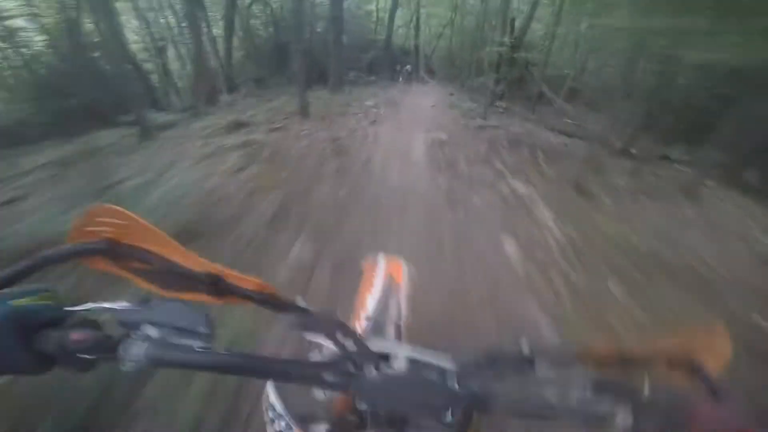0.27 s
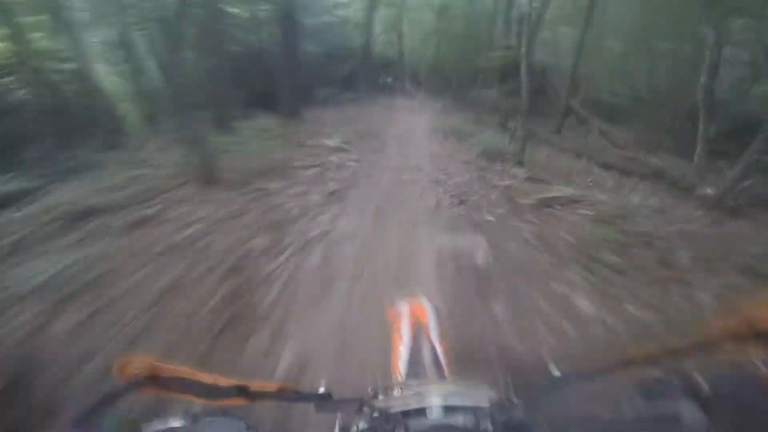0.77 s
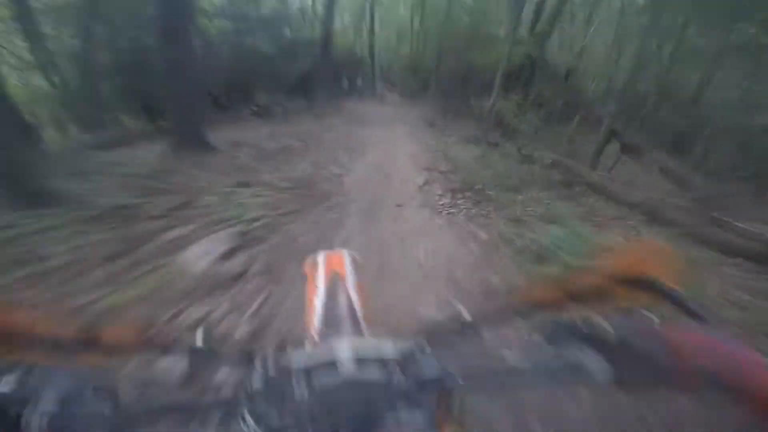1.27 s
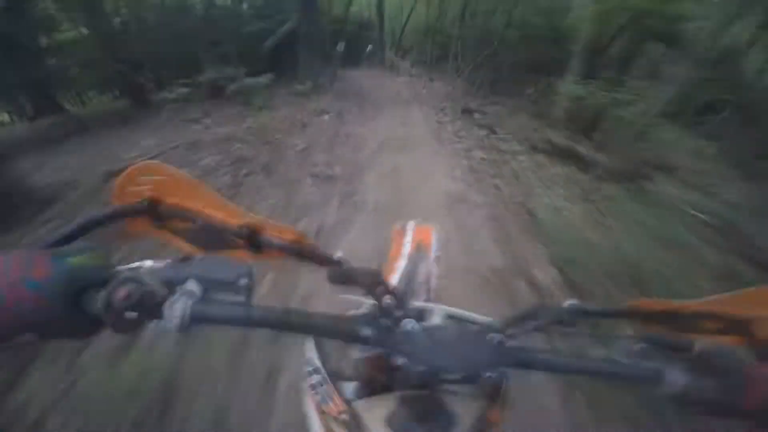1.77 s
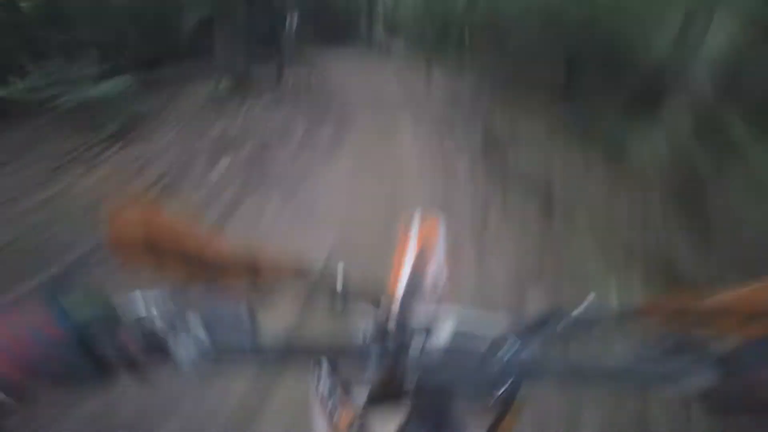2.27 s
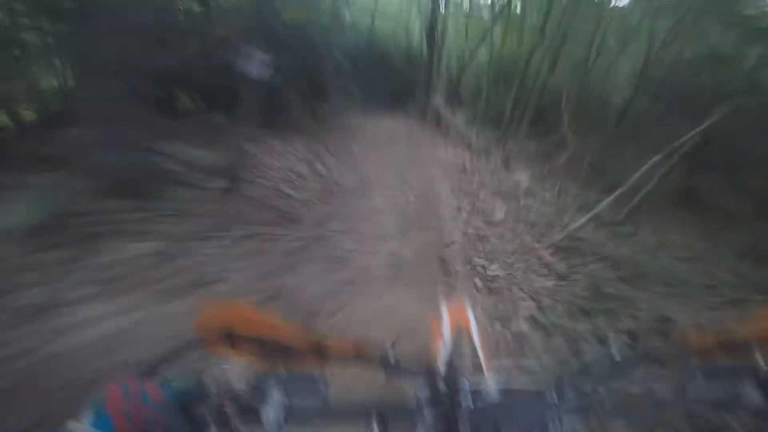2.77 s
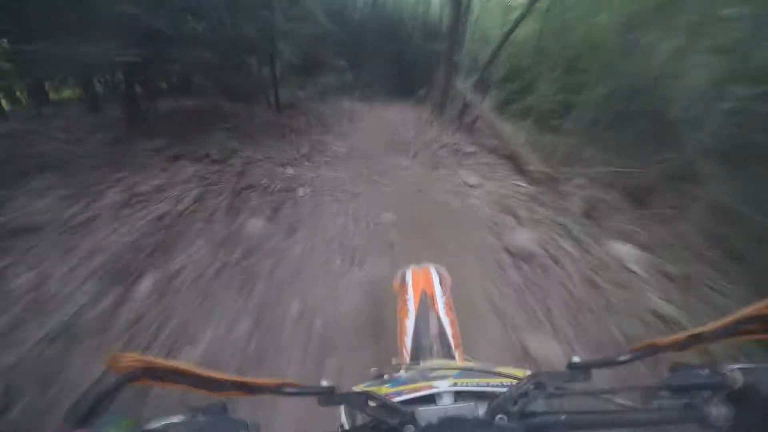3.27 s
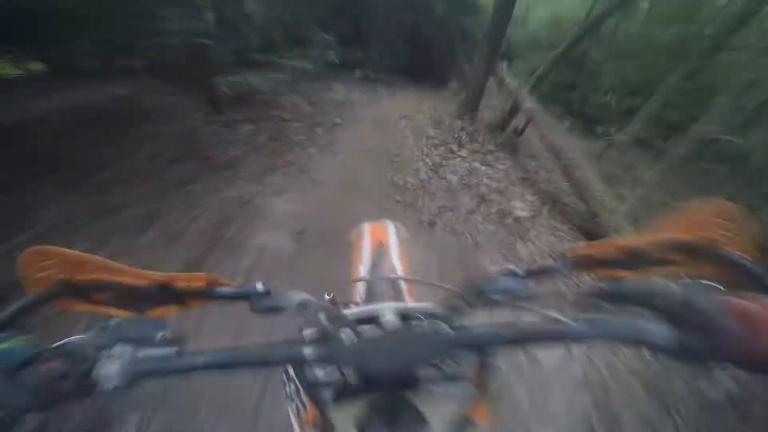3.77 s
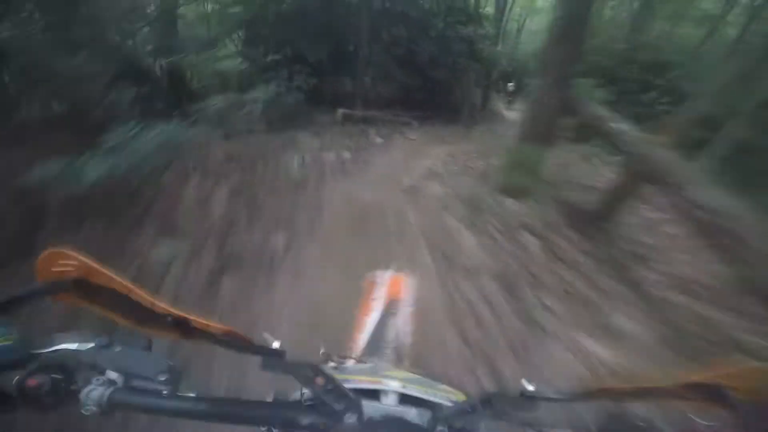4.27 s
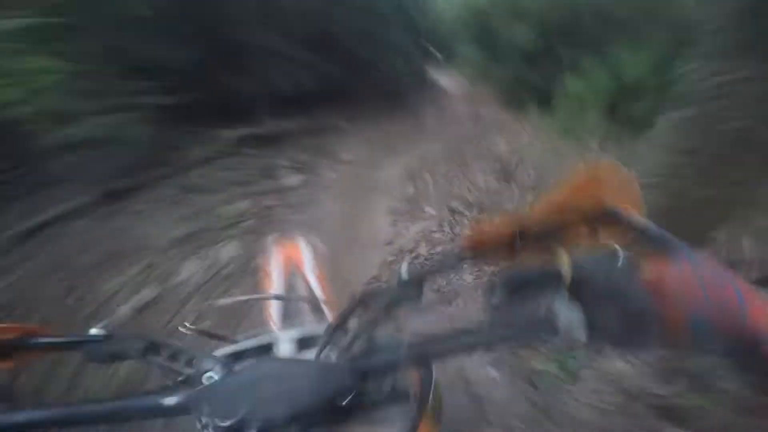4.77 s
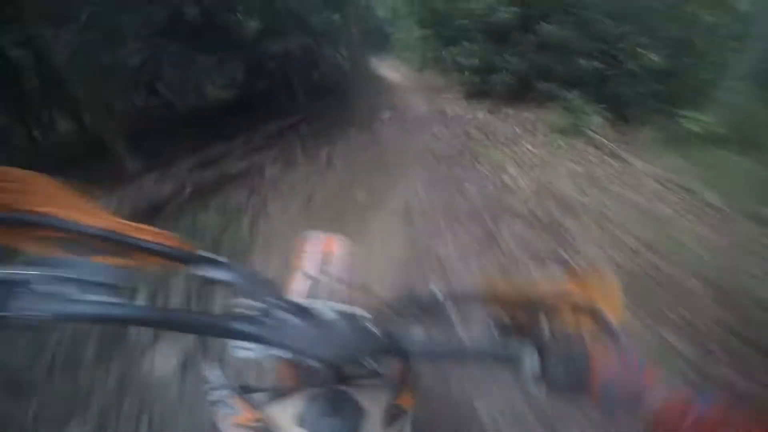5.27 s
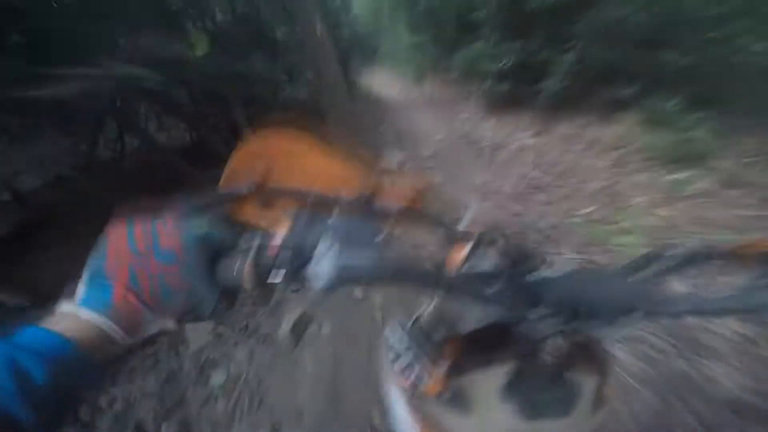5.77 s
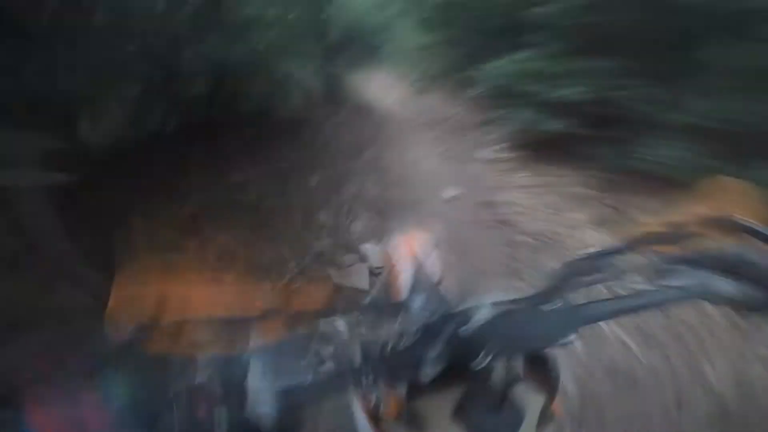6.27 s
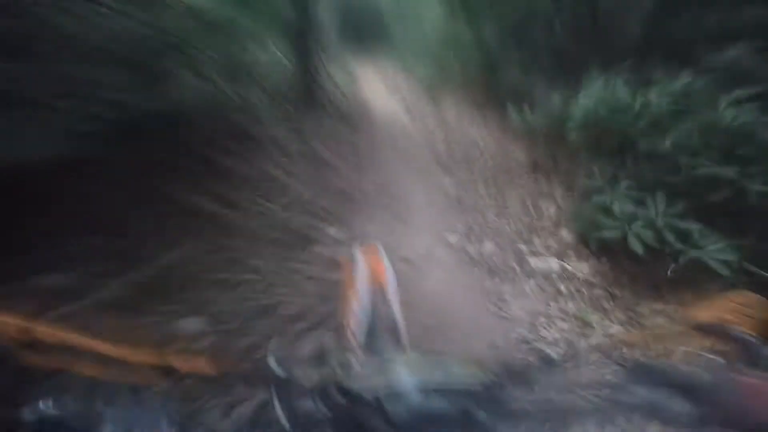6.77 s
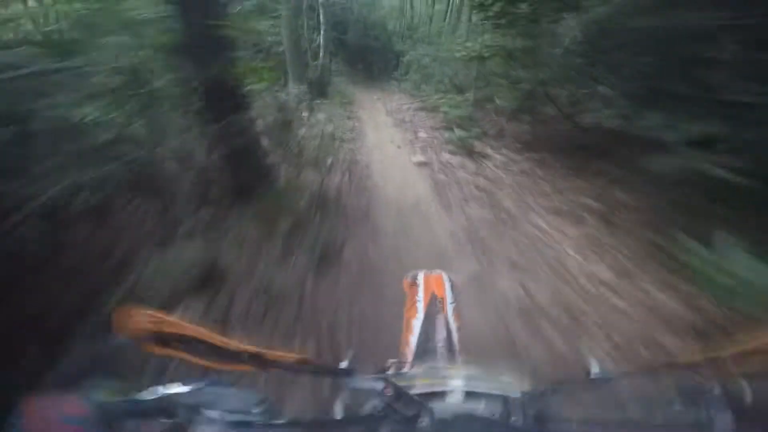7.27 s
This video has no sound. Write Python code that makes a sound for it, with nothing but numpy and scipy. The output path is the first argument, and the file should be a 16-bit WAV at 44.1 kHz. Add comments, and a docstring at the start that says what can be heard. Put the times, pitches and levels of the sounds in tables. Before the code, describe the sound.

Deep, uneven thuds and rumble shake a microphone worn by a mountain bike rider on a woodland trail. Close below, tyres crackle over dirt, chain and cables slap, wheels knock on roots and the coasting hub whirrs softly. After one short grab of the brake, a longer stuttering pull turns into a gritty skid in the middle. The tyre grips with a heavy jolt, and after another short brake stutter the bike rattles on.

```python
"""A dirt trail in a wood; the microphone is in a camera strapped to the rider of a fast mountain bike.
From the start, close below, tyres hiss and crackle over grit and the coasting hub whirrs; roots jolt
the camera, which thuds and sways on its mount; chain and cables rattle. At 2.5 s the brake grabs briefly.
Near 4 s a tyre stutters and skids through a turn, and the nearby bank throws the hiss back.
At 5 s it grips again; a last dab of the brake at 6.4 s leads onto more stony ground."""
import sys
import numpy as np
from scipy import signal
from scipy.fft import rfft, irfft
from scipy.io import wavfile

SR = 44100
rng = np.random.default_rng(int(sys.argv[2]) if len(sys.argv) > 2 else 0)


def wrap_up_sound(samples):
    """Save the sound to the file named by the first command line argument, as 16-bit audio."""
    columns = np.atleast_2d(samples).T
    # keep every value between -1 and 1, then stretch to whole-number steps
    tamed = np.clip(columns, -1, 1)
    steps = np.round(tamed * 32767).astype(np.int16)
    wavfile.write(sys.argv[1], SR, steps)


N = 332514
TIME = np.arange(N) / SR


def gain_of(db):
    """Decibels to amplitude."""
    return 10 ** (np.asarray(db) / 20)


def unit_rms(x):
    """Scales to rms 1."""
    return x / np.sqrt(np.mean(x ** 2) + 1e-20)


def curve(rows):
    """Joins (time, value) rows by straight lines."""
    return np.interp(TIME, *np.transpose(rows))


def add(mix, s, sound):
    """Mixes a sound in at time s."""
    start = round(s * SR)
    sound = sound[max(-start, 0):]
    part = mix[max(start, 0):][:len(sound)]
    part += sound[:len(part)]


def coloured(x, spectrum, size=8192):
    """Minimum-phase filter of unit energy: the spectrum sets the colour, not the level."""
    hz, db = np.transpose(spectrum)
    bins_hz = abs(np.fft.fftfreq(size, 1 / SR)) + 1
    log_gain = np.log(gain_of(np.interp(np.log(bins_hz), np.log(hz), db)))
    taps = np.fft.ifft(np.exp(np.conj(signal.hilbert(log_gain)))).real[:size // 2]
    return signal.oaconvolve(x, taps / np.linalg.norm(taps))[:len(x)]


def wander(rate_hz):
    """Random drift of rms 1, mostly slower than rate_hz."""
    hz = np.fft.rfftfreq(N, 1 / SR)
    return unit_rms(irfft(rfft(rng.standard_normal(N)) / (1 + (hz / rate_hz) ** 2), N))


def grit(per_s, spread_db):
    """Sparse clicks of grains; a few are much louder, or softer if the spread is negative."""
    size = gain_of(spread_db * np.minimum(rng.exponential(1, N), 5))
    return unit_rms(size * rng.choice([-1, 1], N) * (rng.random(N) < per_s / SR))


def burst(t, rise, t60):
    """A puff of noise that starts at t = 0 and dies away."""
    age = np.maximum(t, 0)
    return rng.standard_normal(len(t)) * (1 - np.exp(-age / rise)) * gain_of(-60 * age / t60)


# Rolling level of the tyres, set by speed and ground: t/s, level/dB
ROLL_LEVEL = [(0.0, -43), (0.65, -43.5), (1.75, -41), (2.2, -45), (2.6, -41.5), (2.88, -49), (3.28, -46.5),
              (3.65, -45), (3.84, -46.5), (4.14, -30.5), (4.3, -36), (4.87, -39), (5.1, -48.5),
              (5.31, -52.5), (6.05, -46.5), (6.55, -39.5), (7.05, -44), (7.54, -43.5)]
# Stony stretches of trail: start t/s, end t/s
STONY_SPANS = [(0.98, 1.144), (1.651, 2.0), (2.3, 2.57), (3.119, 3.27), (3.34, 3.42), (6.48, 7.24)]
# Spectra of crushed soil, flying grit and scrubbing tread: f/Hz, level/dB
ROLL_SPECTRUM = [(150, -22.5), (400, -7), (680, 2), (840, -2), (1230, 2.5), (1520, 1), (1850, 4.5),
                 (2300, -2), (2900, 4), (3500, -6.5), (4100, -1), (5100, -14.5), (6500, -18.5),
                 (10000, -30)]
SPRAY_SPECTRUM = [(2000, -11.5), (4000, 0.5), (5200, 2.5), (6500, -6), (8500, -12), (10000, -15),
                  (12000, -23), (13500, -22), (16000, -51)]
SCRUB_SPECTRUM = [(90, -17), (170, 6), (265, 6.5), (350, 1.5), (450, -3), (560, -5.5), (680, -8),
                  (850, -13.5), (1500, -49)]
def tyres(spray_db=-12, stony_spray_db=-59, scrub_db=-6, jolt_scrub_db=-33.5):
    """Close below the microphone, knobs crush soil in clumps, throw grit and scrub under load."""
    clumps, roll_db = wander(rate_hz=36), curve(ROLL_LEVEL)
    stony = sum((TIME > start) & (TIME < end) for start, end in STONY_SPANS)
    stony_spray = gain_of(stony_spray_db + 2.9 * wander(rate_hz=8.3)) * stony
    thrown = np.hypot(gain_of(roll_db + spray_db), stony_spray)
    crunch = unit_rms(rng.standard_normal(N) + 0.62 * grit(per_s=1500, spread_db=2))
    fizz = unit_rms(rng.standard_normal(N) + gain_of(-18) * grit(per_s=330, spread_db=-3.5))
    roll = coloured(crunch, ROLL_SPECTRUM) * gain_of(roll_db + 2.2 * clumps)
    spray = coloured(fizz, SPRAY_SPECTRUM) * thrown * gain_of(2 * clumps + 2 * wander(rate_hz=25))
    load = gain_of(jolt_scrub_db) * jolt_load(rise_s=0.0061, fall_s=0.039)
    pressed = np.hypot(gain_of(scrub_db) * frame_vibration(), load)
    scrub = coloured(rng.standard_normal(N), SCRUB_SPECTRUM) * pressed
    scrub *= gain_of(4 * wander(rate_hz=47) + 2 * wander(rate_hz=8))
    # flung pebbles tick on the frame
    tick = burst(np.arange(SR // 40) / SR, rise=0.0006, t60=0.029)
    ticks = unit_rms(signal.oaconvolve(grit(per_s=60, spread_db=-0.5), tick)[:N])
    pebbles = coloured(ticks, STRIKE_SPECTRUM) + 0.14 * coloured(ticks, SIZZLE_SPECTRUM)
    return roll + spray + scrub + pebbles * thrown


# Spectrum of ploughed soil: f/Hz, level/dB
SOIL_SPECTRUM = [(200, -23), (550, -2), (840, -23), (1250, 3), (1850, 3), (2300, -2.5), (3050, 7.5),
                 (3600, -2), (5000, -16), (9000, -69)]
def skid(peak_s=4.09, grip_s=5.02, rise_db_per_s=99, grip_db_per_s=300):
    """The sliding tyre ploughs loose soil: a burst of sand, then a darker, lumpy roar until it grips."""
    since_peak = np.maximum(TIME - peak_s, 0)
    swell_db = -rise_db_per_s * np.maximum(peak_s - TIME, 0)
    grip_db = -grip_db_per_s * np.maximum(TIME - grip_s, 0)
    soil = unit_rms(rng.standard_normal(N) + 0.88 * grit(per_s=2700, spread_db=2))
    sand = unit_rms(rng.standard_normal(N) + 0.73 * grit(per_s=6500, spread_db=9))
    roar = coloured(soil, SOIL_SPECTRUM) * gain_of(-35 - 14.5 * since_peak + 2.5 * wander(rate_hz=46))
    spray = coloured(sand, SPRAY_SPECTRUM) * gain_of(-33.5 - 63 * since_peak)
    return (roar + spray) * gain_of(swell_db + grip_db)


# Pulls of the brake: start t/s, end t/s, starting level/dB, final level/dB
BRAKE_PULLS = [(2.52, 2.63, -31, -35), (3.767, 4.133, -26.5, -22), (6.428, 6.54, -25, -22.5)]
def brake_stutter(grunt_hz=254.7, squawk_hz=548):
    """The braked tyre grabs and lets go in a quick run; each grab is a rough grunt with a scrape."""
    out, t = np.zeros(N), np.arange(SR // 10) / SR
    swell = t / 0.0049 * np.exp(1 - t / 0.0063)
    for start, end, first_db, last_db in BRAKE_PULLS:
        for s in grab_times(start, end):
            late, detune, uneven = rng.standard_normal(3)
            angle = 2 * np.pi * t * (1 + 0.096 * detune)
            squawk = gain_of(-16.5 + 50 * (s - start))  # the upper tone grows while the brake is held
            tone = (np.sin(grunt_hz * angle) + squawk * np.sin(squawk_hz * angle)) / np.hypot(1, squawk)
            roughness = 0.35 * coloured(rng.standard_normal(len(t)), SCRUB_SPECTRUM)
            grunt = tone * gain_of(-60 * t / 0.12) + roughness
            scrape = gain_of(-17.5) * coloured(rng.standard_normal(len(t)), PAWL_SPECTRUM)
            db = np.interp(s, [start, end], [first_db, last_db]) + 0.61 * uneven
            add(out, s + 0.002 * late, gain_of(db) * swell * (grunt + scrape))
    return out


def grab_times(start, end, per_s=28, quicken_per_s2=85):
    """The tyre grabs faster and faster during one pull of the brake."""
    held = np.arange(0, end - start, 1 / SR)
    count = np.floor(per_s * held + quicken_per_s2 * held ** 2 / 2)
    return start + held[np.diff(count, prepend=-1) > 0]


MOUNT_HZ = 53.52  # the camera mount's own swing
# Heavy jolts at the microphone: crest t/s, thud level/dB, thud f/Hz, sway level/dB
CAMERA_JOLTS = [(0.024, -21, 82, -15.5), (0.129, -11.5, 92, -12.5), (0.298, -14, 86, -6.5),
                (0.563, -21, 117, -24), (0.784, -8.5, 91, -11), (0.935, -15, 92, -15),
                (1.104, -10.5, 81.5, -18), (1.181, -17, 93, -9), (1.318, -15, 93, -17.5),
                (1.436, -9, 85, -6.5), (1.637, -15.5, 96, -8.5), (1.864, -23.5, 103, -15.5),
                (2.032, -1.5, 96.5, -9), (2.455, -13.5, 98, -17), (2.547, -16, 86, -17),
                (2.74, -3.5, 83, -8.5), (3.073, -21.5, 97, -15.5), (3.521, -7.5, 98, -8.5),
                (3.773, -18.5, 99, -16.5), (3.922, -18.5, 93.5, -10), (4.018, -4, 92, -37),
                (4.072, -11, 94, -11.5), (4.243, -18.5, 84, -14.5), (4.612, -8.5, 97.5, -8.5),
                (4.738, -11.5, 96, -12.5), (5.017, -2, 78, -7.5), (5.445, -10, 97.4, -10),
                (5.639, -19.5, 84, -19), (5.836, -19.5, 102, -18), (6.094, -8, 94.5, -8.5),
                (6.294, -11, 95, -7), (6.519, -6, 110, -4.5), (6.741, -16, 102, -8), (6.985, -12, 86, -7),
                (7.46, -19, 103, -20)]
def jolts(sway_t60=0.93, lead_s=0.03):
    """Each jolt thuds through the camera; the mount swings on until the next jolt seats it anew."""
    out, t = np.zeros(N), np.arange(SR) / SR - lead_s
    next_times = [row[0] for row in CAMERA_JOLTS[1:]] + [N / SR + 1]
    for (s, thud_db, hz, sway_db), next_s in zip(CAMERA_JOLTS, next_times):
        onset = (1 + np.tanh((t + 0.002) / 0.009)) / 2
        cutoff = (1 - np.tanh((s + t - next_s + 0.006) / 0.003)) / 2
        sway = gain_of(sway_db - 60 * t / sway_t60) * onset * cutoff * np.cos(2 * np.pi * MOUNT_HZ * t)
        # the rider's body gives
        heave = gain_of(thud_db - 5) * np.exp(-(t / 0.022) ** 2) * np.cos(2 * np.pi * 37 * t)
        add(out, s - lead_s, thud(t, thud_db, hz) + sway + heave)
    return out


def thud(t, db, hz):
    """A few low cycles that crest at t = 0."""
    push = np.where(t < 0, np.exp(-(t / 0.01) ** 2), 1 / np.cosh(t / 0.0091))
    return gain_of(db) * push * np.cos(2 * np.pi * hz * t)


def jolt_load(rise_s, fall_s):
    """The weight that the jolts put on the bike builds up to each crest and eases off."""
    power, t = np.zeros(N), np.arange(-SR // 2, SR // 2) / SR
    shape = np.exp(-np.maximum(-t / rise_s, t / fall_s))
    for s, thud_db, _, _ in CAMERA_JOLTS:
        add(power, s + t[0], (gain_of(thud_db) * shape) ** 2)
    return np.sqrt(power)


def frame_vibration(top_db=-41):
    """How hard the frame shakes: it follows the rolling level, capped below the skid's surge."""
    return gain_of(top_db + 0.96 * np.minimum(curve(ROLL_LEVEL) - top_db, 0))


def bumps(per_s=6.5, thud_hz=99.7):
    """Small bumps knock the frame, thud lightly and nudge the mount, harder the faster the bike rolls."""
    out, t, vibration = np.zeros(N), np.arange(-SR // 30, SR // 2) / SR, frame_vibration()
    swing = (1 + np.tanh(t / 0.009)) / 2 * np.cos(2 * np.pi * MOUNT_HZ * t)
    ringing = swing * gain_of(2.5 - 60 * t / 0.49) + gain_of(-16) * frame_ring(t + 0.01)
    slots = np.arange(0, N / SR, 1 / per_s)
    for s, (late, softness) in zip(slots, rng.random((len(slots), 2))):
        db = 20 * np.log10(np.interp(s, TIME, vibration)) + 20 - 8 * softness
        add(out, s + late / per_s + t[0], thud(t, db, thud_hz) + gain_of(db) * ringing)
    return out


# Wheel strikes: t/s, knock level/dB, crack level/dB, crack f/Hz
WHEEL_STRIKES = [(0.999, -30, -38, 1670), (1.427, -23.5, -41, 1940), (1.624, -27, -27, 1220),
                 (1.777, -35, -24.5, 2140), (2.003, -21, -26, 1640), (2.022, -20, -16, 1144),
                 (2.725, -17, -23, 2096), (4.592, -23.5, -28, 1580), (5.001, -12.5, -20, 1430),
                 (5.01, -22.5, -17.5, 1090), (5.428, -32, -40, 1200), (5.611, -34, -31, 1130),
                 (6.074, -26.5, -27.5, 1245), (6.223, -25.5, -27, 2170), (6.501, -36, -28, 2070),
                 (7.448, -24.5, -31.5, 1250)]
# Spectra of the dull knock and the sharp crack: f/Hz, level/dB
KNOCK_SPECTRUM = [(80, 16), (160, -7), (250, 5.5), (380, 1), (550, -15.5), (900, -42), (2500, -70)]
CRACK_SPECTRUM = [(300, 5), (600, -4.5), (820, 2), (1300, -5), (2200, -1), (2900, -20), (6000, -23),
                  (12000, -37)]
def wheel_knocks(crack_t60=0.034):
    """A wheel meets a root or stone: a short pitched crack and a hollow knock through the frame."""
    out, t = np.zeros(N), np.arange(SR // 6) / SR
    onset = 1 - np.exp(-t / 0.0027)
    ring = frame_ring(t)
    for s, knock_db, crack_db, crack_hz in WHEEL_STRIKES:
        knock = ring + gain_of(-5.5) * coloured(burst(t, rise=0.002, t60=0.064), KNOCK_SPECTRUM)
        tone = onset * gain_of(-60 * t / crack_t60) * np.sin(2 * np.pi * crack_hz * t)
        crack = coloured(burst(t, rise=0.0017, t60=crack_t60), CRACK_SPECTRUM) + tone
        add(out, s, gain_of(knock_db) * knock + gain_of(crack_db) * crack)
    return out


# Modes of the frame: f/Hz, level/dB, t60/s
FRAME_MODES = [(148, -27, 0.037), (247, 4.5, 0.037), (349, -6, 0.031), (525, -5.5, 0.042),
               (1313, -11, 0.052)]
def frame_ring(t):
    """The frame rings hollow after a blow at t = 0."""
    age = np.maximum(t, 0)
    ring = sum(gain_of(db - 60 * age / t60) * np.sin(2 * np.pi * hz * age) for hz, db, t60 in FRAME_MODES)
    return (1 - np.exp(-age / 0.0018)) * ring


# Loud slaps of chain and cables: t/s, level/dB, relative clack level/dB, ping f/Hz
CHAIN_SLAPS = [(0.272, -32, -14, 4040), (0.422, -29, 3.5, 3830), (1.001, -32, -4, 4270),
               (1.1346, -32.5, -12, 5200), (1.4285, -33, 3, 4030), (1.579, -28, 3, 4100),
               (1.6198, -34, 4, 4140), (1.7817, -24.5, 4, 4240), (1.8325, -28.5, 3, 3750),
               (1.8483, -30, 1, 4030), (1.987, -40, -2, 3840), (2.0144, -25, 5, 3980),
               (2.1084, -30.5, -1, 4040), (2.563, -31, -4, 5000), (2.583, -25, -19, 4100),
               (2.6658, -23.5, -4, 5000), (2.677, -28.5, 6, 3870), (2.7195, -30, -3, 4020),
               (2.9548, -39.5, 2, 3980), (3.038, -38, 7.5, 4260), (3.117, -31, 8, 5400),
               (3.1284, -28.5, 5, 4230), (3.176, -34, -18, 5230), (3.242, -33.5, 6, 4170),
               (3.255, -40, -12, 5500), (3.3386, -34.5, 10.5, 4400), (3.35, -30.5, -1, 4340),
               (3.4014, -33, 1, 4660), (3.464, -38, 7, 4100), (3.6226, -31, 4.5, 4500),
               (3.83, -41, 13.5, 4300), (4.5288, -25, 2, 5160), (4.7764, -28, -1, 3920),
               (5.011, -28.5, 1, 5360), (5.3323, -40.5, 3, 5100), (5.8147, -34.5, 0, 4250),
               (6.3182, -34, -1, 5190), (6.556, -31, 6, 4360), (6.6935, -33, -4, 4120),
               (6.7388, -33, 6.5, 4070), (7.48, -33, 0, 4785)]
def chain_rattle(chatter_per_s=17, chatter_db=-36.5):
    """Chain and cables slap the bike, with lighter, uneven chatter over the stony stretches."""
    out = np.zeros(N)
    for s, db, clack_db, ping_hz in CHAIN_SLAPS:
        add(out, s, gain_of(db) * slap(clack_db, ping_hz))
    for start, end in STONY_SPANS:
        for slot in np.arange(start, end, 1 / chatter_per_s):
            db = chatter_db + 2.5 * rng.standard_normal()
            s = slot + rng.random() / chatter_per_s
            add(out, s, gain_of(db) * slap(clack_db=2.5, ping_hz=rng.uniform(3900, 5100)))
    return out


# Modes of the bike's metal parts: f/Hz, level/dB, t60/s
METAL_MODES = [(1796, 3.5, 0.032), (2880, -7, 0.038), (3540, 4.5, 0.12), (4060, 13.5, 0.041),
               (5115, 0.5, 0.12), (5340, -16, 0.021), (6060, -25, .03), (7260, -10, 0.044)]
# Spectra of a strike on metal, its midrange clack and its top sizzle: f/Hz, level/dB
STRIKE_SPECTRUM = [(400, -27), (1000, -28), (2000, -12.5), (3000, 0.5), (4000, 3), (4600, 6.5), (5300, 0),
                   (7000, -6), (9000, -14.5), (11500, -24.5), (16000, -36)]
CLACK_SPECTRUM = [(200, -17.5), (600, 8.5), (1200, -4), (1900, 7), (2900, 9), (5000, -22), (9000, -27)]
SIZZLE_SPECTRUM = [(3000, -11), (5300, 8.5), (7000, 2), (9000, -8), (11500, -12.5), (13500, -15),
                   (16000, -24)]
def slap(clack_db, ping_hz, slap_t60=0.032):
    """Chain links strike twice in quick succession and ring the metal parts."""
    t = np.arange(SR // 8) / SR
    strikes = burst(t, rise=0.0013, t60=slap_t60)
    strikes += 0.2 * burst(t - slap_t60 * rng.uniform(0.074, 0.5), rise=0.00026, t60=0.085)
    ring = np.zeros(len(t))
    for hz, db, t60 in METAL_MODES:
        envelope = rng.uniform(-0.35, 1) * gain_of(db - 60 * t / t60)
        ring += envelope * np.sin(2 * np.pi * hz * rng.uniform(0.99, 1.02) * t)
    ping = (1 - np.exp(-t / 0.00053)) * gain_of(-60 * t / 0.023) * np.sin(2 * np.pi * ping_hz * t)
    metal = 0.99 * coloured(strikes, STRIKE_SPECTRUM) + gain_of(-9.5) * ring + gain_of(-1) * ping
    clack = gain_of(clack_db) * coloured(burst(t, rise=0.002, t60=slap_t60), CLACK_SPECTRUM)
    sizzle_db = -8 + 4.4 * rng.standard_normal()
    sizzle = gain_of(sizzle_db) * coloured(burst(t, rise=0.00039, t60=0.041), SIZZLE_SPECTRUM)
    return metal + clack + sizzle


# Spectrum of the rumble at the microphone: f/Hz, level/dB
RUMBLE_SPECTRUM = [(8, -10.5), (20, -2), (32, 1), (41, 1.5), (54, -15.5), (70, -16.5), (100, -13),
                   (135, -20), (170, -36), (300, -45.5), (900, -83.5)]
def camera_rumble():
    """Air and trail shake the camera: a lumpy rumble that follows the speed and surges at each jolt."""
    steady = gain_of(14 + 2.5 * wander(rate_hz=6.4)) * frame_vibration()
    surges = gain_of(-7) * jolt_load(rise_s=0.029, fall_s=0.047)
    return coloured(rng.standard_normal(N), RUMBLE_SPECTRUM) * np.hypot(steady, surges)


# Whirr of the coasting hub: t/s, level/dB
HUB_LEVEL = [(0, -53.5), (.9, -46.5), (1.3, -60), (2.9, -56), (3.7, -55), (5.05, -54), (5.3, -76),
             (5.48, -53), (5.7, -74), (6.15, -53.5), (7.0, -55), (7.54, -47)]
# Spectrum of its pawls: f/Hz, level/dB
PAWL_SPECTRUM = [(1000, -35), (2300, -1), (2700, 13.5), (3050, 15.5), (3500, 3), (4100, -14), (5100, 5),
                 (7000, -22), (12000, -56)]
def freewheel(clicks_per_s=266):
    """Behind the rider, the hub's pawls tick so fast and unevenly that they blur into a whirr."""
    teeth = np.cumsum(clicks_per_s * (1 + 0.027 * wander(rate_hz=3))) / SR
    whirr = coloured(np.exp(-(teeth % 1) / 0.28) * rng.standard_normal(N), PAWL_SPECTRUM)
    drift = np.cumsum(0.045 * wander(rate_hz=7))  # the pitch wavers by a few percent
    whirr = np.interp((np.arange(N) + drift) % N, np.arange(N), whirr)
    return unit_rms(whirr) * gain_of(curve(HUB_LEVEL) + 2 * wander(rate_hz=9.1))


def tread_hum(knobs_per_s=250, level_db=-58.5):
    """The knobs drum a faint, unsteady hum on the ground."""
    cycles = np.cumsum(knobs_per_s * (1 + 0.044 * wander(rate_hz=15.4))) / SR
    return np.sqrt(2) * np.sin(2 * np.pi * cycles) * gain_of(level_db + 4.5 * wander(rate_hz=4.8))


def passing_bank(hiss, loudest_s=4.38, width_s=0.29, delay_s=0.01195, delay_growth=0.00747):
    """A bank about 2 m off falls behind: its echo comes ever later and sweeps the hiss downward."""
    since = TIME - loudest_s
    share = np.exp(-(since / width_s) ** 2)
    echo = np.interp(TIME - delay_s - delay_growth * since, TIME, hiss)
    return (hiss + share * echo) / np.sqrt(1 + share ** 2)


# Reflections off the rider and the bars: delay t/ms, share of the amplitude
NEAR_ECHOES = [(1.798, 0.11), (3.2, 0.068), (4.151, 0.088)]
def surroundings(bike):
    """Reflections close to the microphone, then a faint, short scatter from the trees."""
    echoes = sum(share * np.interp(TIME - ms / 1000, TIME, bike) for ms, share in NEAR_ECHOES)
    tail = burst(np.arange(SR // 2) / SR, rise=0.005, t60=0.36)
    trees = gain_of(-19.5) * signal.oaconvolve(bike, tail / np.linalg.norm(tail))[:N]
    return bike + echoes + trees


def scene():
    """The bike reaches the mono microphone through the air, the jolts through the mount."""
    hiss = passing_bank(tyres() + skid())
    bike = hiss + tread_hum() + freewheel() + brake_stutter() + chain_rattle() + wheel_knocks()
    return (surroundings(bike) + jolts() + bumps() + camera_rumble())[None]


def record(dry, edge_hz=15400):
    """The camera flattens the heaviest thuds near full scale, then cuts the highest treble."""
    limited = 0.96 * dry / (1 + dry ** 6) ** (1 / 6)
    lowpass = signal.firwin(511, edge_hz, window=("kaiser", 9), fs=SR)
    return signal.oaconvolve(limited, lowpass[None], "same")


dry = scene()
out = record(dry)
wrap_up_sound(out)
```